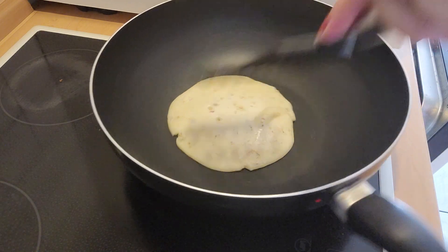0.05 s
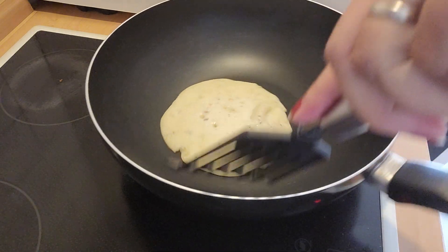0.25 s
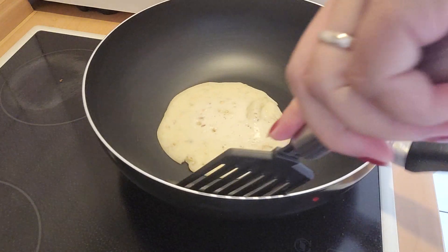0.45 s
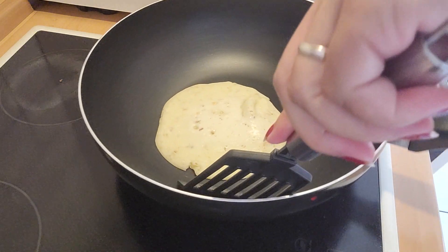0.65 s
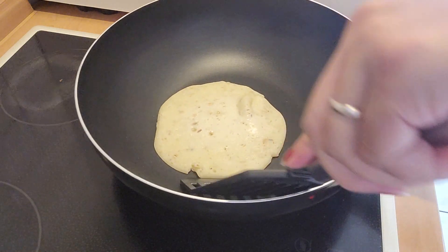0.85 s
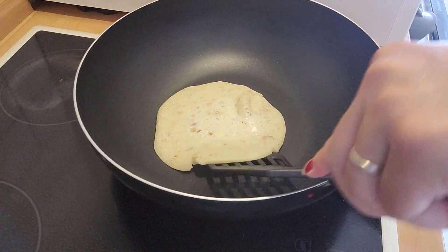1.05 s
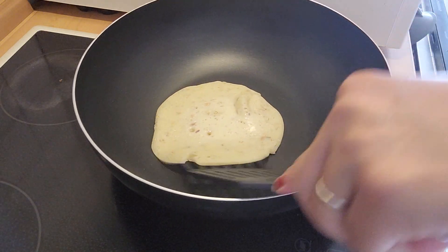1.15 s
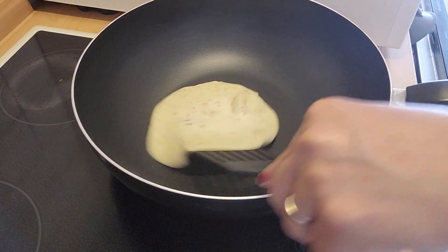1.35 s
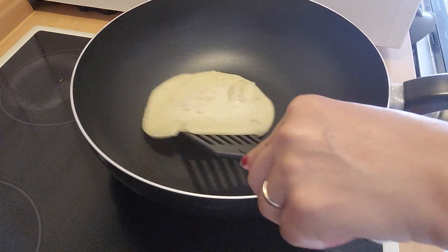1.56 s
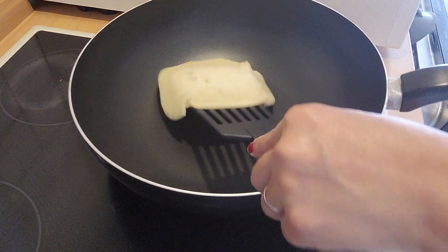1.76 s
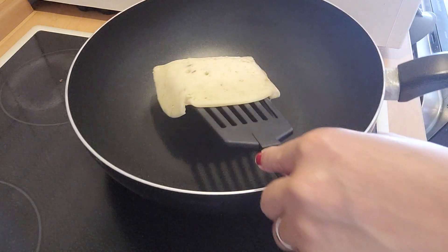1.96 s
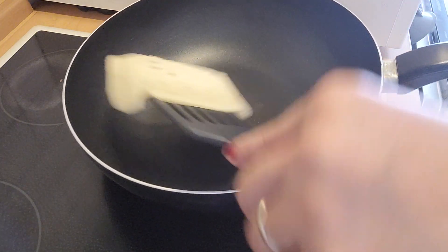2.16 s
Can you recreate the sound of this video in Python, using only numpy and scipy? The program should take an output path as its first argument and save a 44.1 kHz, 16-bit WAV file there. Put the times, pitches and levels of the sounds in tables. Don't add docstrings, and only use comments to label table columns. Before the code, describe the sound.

Close up, a spatula blade clicks down on a coated pan, pauses faintly, then scratches under a pancake in short irregular bursts, with low pan thuds, soft hum and a distant dull knock at the end.

```python
import sys
import numpy as np
from scipy import signal
from scipy.fft import rfft, irfft
from scipy.io import wavfile
from scipy.ndimage import uniform_filter1d

SR = 44100
rng = np.random.default_rng(int(sys.argv[2]) if len(sys.argv) > 2 else 0)


def store_wav(level_fs):
    pcm = np.round(np.clip(np.atleast_2d(level_fs), -1, 1) * 32767)
    wavfile.write(sys.argv[1], SR, pcm.T.astype(np.int16))


def volts(x):
    e = np.asarray(x, float) / 20
    return 10 ** e


N = 97020
T = np.arange(N) / SR


def ring(x, hz, width_hz):
    return signal.lfilter(*signal.iirpeak(hz, hz / width_hz, fs=SR), x)


def mode(x, hz, width_hz, skirt):
    sharp = ring(x, hz, width_hz)
    return np.sqrt(SR / np.pi / width_hz) * ring(sharp, hz, skirt * width_hz)


def unit(x):
    return x / np.sqrt(np.mean(x ** 2))


def colour(x, points):
    hz, db = np.array(points, float).T
    log_hz = np.log(np.arange(N // 2 + 1) * SR / N + 1)
    gain = volts(np.interp(log_hz, np.log(hz), db, left=-70))
    return unit(irfft(rfft(x) * gain, N))


def walk(rate):
    hold = max(int(SR / rate), 50)
    levels = rng.standard_normal(N // 50 + 1)
    steps = np.repeat(levels, hold)[:N]
    return unit(uniform_filter1d(uniform_filter1d(steps, hold), hold))


def swell(rows, shape):
    s, rise, fall, db = np.array(rows).T[:4, :, None]
    away = np.where(T < s, (s - T) / rise, (T - s) / fall)
    return volts(db - 20 * np.minimum(away, 20) ** shape)


def struck(s, hz, db, t60, push_s):
    since = np.maximum(T - s, 0)
    fade = volts(db - 60 * since / t60)
    return fade * (1 - np.exp(-since / push_s)) * np.sin(2 * np.pi * hz * since)


def trio():
    return rng.standard_normal(size=(3, N))


def ports(rows):
    lag, share = 3.59, 0.43
    late = irfft(rfft(rows[0]) * np.exp(-2j * np.pi * np.arange(N // 2 + 1) / N * lag), N)
    return np.sqrt(share) * np.array([late, rows[0]]) + np.sqrt(1 - share) * rows[1:]


# (pitch [Hz], level per Hz [dB])
AIR_SPECTRUM = [(71, -37.5), (140, 0), (195, -10.5), (260, -0.5), (410, -29), (592, -6.5), (800, -41.5),
                (1400, -54), (7660, -48), (16000, -42.5)]


def still_air():
    hush = volts(-69) * colour(rng.standard_normal(N), AIR_SPECTRUM)
    vent = unit(ring(rng.standard_normal(N), 581, 88))
    return hush + volts(-74.5 + 1.5 * walk(10)) * vent


def air():
    mid, left, right = still_air(), still_air(), still_air()
    return 0.82 * mid + 0.62 * np.array([left, right])


# (time [s], level [dB])
RUMBLE_LEVEL = [(0, -4), (.3, 4), (.9, 3.5), (1.1, -2.5), (1.6, 1), (2.0, -1.5), (2.2, -6.5)]


def rumble_and_hum():
    noise = trio()
    noise = noise[0] + 0.22 * noise[1:]
    rumble = unit(ring(ring(noise, 48.7, 15.6), 48.7, 31.2))
    throb = unit(ring(ring(noise, 33.2, 20), 33.2, 27))
    hum = np.sqrt(2) * volts(2.2 * walk(12)) * np.sin(2 * np.pi * 100.1 * T + .35 * walk(7.9))
    rumble_db = -57 + np.interp(T, *np.array(RUMBLE_LEVEL).T)
    return volts(rumble_db) * rumble + volts(-61) * hum + volts(-62) * throb


# (time [s], level [dB], loudest pitch [Hz], lift of that pitch [dB])
FAR_KNOCKS = [
    (.014, -60, 1080, 19),
    (1.951, -43, 991, 7),
]
# (pitch [Hz], level [dB], time to die by 60 dB [s])
WOOD_MODES = [(300, -2, .08), (490, 0.5, 0.077), (595, -4, 0.087), (845, -6, 0.16), (991, -7, 0.18),
              (1080, -9.5, 0.13), (1227, -4, 0.11), (1470, -4, 0.15), (2433, -23, .05)]


def knocks():
    push_s, body_hz, body_db, body_t60 = .005, 900, -16.5, 0.27
    out = 0
    for s, db, top_hz, lift_db in FAR_KNOCKS:
        since = np.maximum(T - s, 0)
        push = (since > 0) * np.exp(-since / push_s) * ports(trio())
        out = out + struck(s, top_hz, db + lift_db - 17.5, .17, 0.0011)
        body = (since > 0) * volts(db + body_db - 60 * since / body_t60) * ports(trio())
        out = out + 4 * ring(ring(body, body_hz, 630), body_hz, 720)
        for hz, rel_db, t60 in WOOD_MODES:
            lift = lift_db * np.exp(-(np.log2(hz / top_hz) / .06) ** 2)
            tone = ring(ring(push, hz, 2.4 / t60), hz, hz / 3)
            out = out + volts(db + 17 + rel_db + lift) * tone * np.sqrt(t60 / 0.087)
    return out


# (time [s], level [dB])
SLEEVE_LEVEL = [(0, -72), (.04, -71.5), (.15, -76), (.26, -71.5), (.293, -65), (.32, -74), (.37, -79),
                (.7, -73), (.79, -78), (1.78, -77.5), (1.9, -75), (1.97, -74), (2.03, -85), (2.2, -91)]
# (pitch [Hz], level per Hz [dB])
CLOTH_SPECTRUM = [(410, -41.5), (700, -11), (1060, 0), (1500, -13.5), (3800, -14.5), (4400, -3.5),
                  (13000, -6), (16000, -12.5)]


def sleeve():
    rub = ports(trio()) * volts(1.5 * walk(60) + 1.4 * walk(400))
    return colour(rub, CLOTH_SPECTRUM) * volts(np.interp(T, *np.array(SLEEVE_LEVEL).T) + 3.5)


# (time [s], pitch [Hz], level [dB], time to die by 60 dB [s])
WORKTOP_THUDS = [(.25, 165, -66, 0.56), (.27, 52.7, -44, 0.47), (.386, 285.7, -49.5, .12),
                 (.388, 75, -41, 0.32), (.39, 174.6, -53, 0.24), (.43, 59.7, -42, 0.21),
                 (0.439, 165.6, -54, .2), (.55, 184, -57, 0.21), (.66, 169, -59, .25),
                 (.53, 67.6, -40.5, .3), (.545, 135.6, -48.5, .25), (0.649, 115, -49, 0.22),
                 (.73, 51.8, -48, 0.53), (.78, 206, -57.5, 0.25), (.80, 269.5, -53, 0.38),
                 (0.799, 78, -46.5, .3), (.74, 139, -58, 0.36), (.84, 166, -56, 0.22),
                 (1.20, 250, -54.5, 0.13), (.90, 60, -54, .2), (1.279, 120.6, -52.5, .2),
                 (1.20, 95, -46, 0.42), (1.21, 72, -47, 0.21)]


def worktop():
    return sum(struck(s, hz, db + 7.0, t60, 0.0092) for s, hz, db, t60 in WORKTOP_THUDS)


def skid():
    start_s, length_s, from_hz, to_hz = 1.198, .022, 2700, 847
    u = np.clip((T - start_s) / length_s, 0, 1)
    hz = from_hz * (to_hz / from_hz) ** u * (1 + 0.0499 * walk(300))
    tone = np.sin(2 * np.pi * np.cumsum(hz) / SR)
    return volts(-38 + 2.5 * walk(250)) * np.sin(np.pi * u) * tone


# (time [s], half length [s], pitch [Hz], level [dB])
SINGING_TONES = [(.39, .015, 5150, -54), (.395, .02, 4450, -62), (.41, 0.028, 1782, -51),
                 (0.418, .03, 561, -55), (.43, .04, 2170, -56), (.43, 0.027, 990, -57),
                 (0.467, 0.026, 1830, -55.5), (0.472, 0.06, 5100, -57.5), (.48, .03, 4500, -61),
                 (.505, 0.031, 1808, -53.5), (.548, .009, 7400, -46), (0.545, .012, 2647, -51),
                 (0.589, .03, 996, -59), (.955, .025, 1627, -58.5), (0.958, .025, 4700, -61),
                 (.988, .016, 1311, -48), (1.01, .02, 3160, -52.5), (1.016, .02, 4470, -50.5),
                 (1.02, 0.034, 1640, -51.5), (1.024, .025, 1830, -50.5), (1.047, 0.021, 1060, -43),
                 (1.07, 0.021, 4500, -50), (1.155, .02, 3000, -57), (1.185, .016, 1840, -41),
                 (1.193, .018, 1726, -44), (1.203, .012, 2380, -48), (1.205, 0.016, 4210, -48.5),
                 (1.205, .015, 4800, -49), (1.229, .025, 2650, -49), (1.26, 0.016, 3200, -51),
                 (1.272, 0.021, 1048, -41.5), (1.277, .02, 2127, -47), (1.29, .02, 4500, -53),
                 (1.30, .03, 4204, -52), (1.39, .018, 3154, -50), (1.395, .015, 1077, -46),
                 (1.395, .012, 1694, -53), (1.39, .02, 720, -52.5), (1.47, 0.021, 1436, -51),
                 (1.479, .025, 2044, -51), (1.475, .022, 772, -49), (1.494, .018, 720, -50),
                 (1.495, 0.019, 3845, -52), (1.505, .015, 3110, -53), (1.574, .02, 682.3, -50),
                 (1.575, .02, 3180, -56), (1.58, .025, 3840, -59), (1.634, 0.026, 712, -53.5),
                 (1.713, .02, 6800, -62.5), (0.742, 0.069, 1000, -75)]


def singing():
    wobble_hz, flicker_db = 21.2, 3.2
    out, wobble, flicker = np.zeros((2, N)), walk(260), walk(110)
    chances = rng.standard_normal(size=(len(SINGING_TONES), 2))
    for (s, half, hz, db), (a, b) in zip(SINGING_TONES, chances):
        near = np.flatnonzero((np.abs(T - s) < 3 * half) & (T > BLADE_LANDINGS[0][0]))
        own = (near + int(abs(a) * N)) % N
        phase = 2 * np.pi * np.cumsum(hz + wobble_hz * wobble[own]) / SR
        lag = 1.09 + 0.27 * b
        env = volts(db + 3.0 + flicker_db * flicker[own]) * np.exp(-((T[near] - s) / half) ** 2)
        out[:, near] += env * np.sin(np.array([phase - lag, phase]))
    return out


# (pitch [Hz], width [Hz], level [dB])
BOWL_MODES = [(166, 16, -14.5), (217, 40, -12), (250, 24, -5.5), (279.8, 24.8, -3), (464.6, 28, -8.5),
              (563, 34, -7), (640, 39, -8)]


def bowl_ring(grains, loudness):
    lifted_db = -20 / (1 + np.exp((1.28 - T) / 0.034))
    drive = volts(-27 + lifted_db) * loudness ** 0.59 * unit(grains)
    out = 0
    for hz, width, db in BOWL_MODES:
        out = out + volts(db) * mode(drive * volts(2.5 * walk(8.95)), hz, width, 2.4)
    return out


# (pitch [Hz], width [Hz], level [dB])
WOK_MODES = [(689, 35, -2.5), (745, 36, -3.5), (859, 38, -5.5), (1060, 36, -4), (1240, 49, -6),
             (1404, 43, -6.5), (1640, 44, -7.5), (1830, 32, -2), (2140, 32, -6), (2440, 100, -6.5),
             (3150, 130, -13), (4210, 45, -9.5), (4480, 40, -5.5), (4700, 54, -8),
             (5110, 90, -8.5), (5580, 72, -10), (6100, 120, -13), (6800, 100, -11), (7340, 140, -8),
             (8280, 120, -7.5)]


def wok_ring(grains, power, pitch):
    favour_db, favour_oct = 5, 0.089
    out = 0
    for hz, width, db in WOK_MODES:
        near = volts(favour_db * np.exp(-(np.log2(hz / pitch) / favour_oct) ** 2))
        drive = np.sqrt(near ** 2 @ power) * grains * volts(1.4 * walk(18))
        out = out + volts(db - 13.5) * mode(drive, hz, width, 6)
    return out


# (pitch [Hz], level per Hz [dB])
EDGE_HISS = [(400, -36), (600, -16.5), (750, -4.5), (1500, -2), (3000, -4), (5500, -4), (11000, -11),
             (16000, -19)]
# (pitch [Hz], level per Hz [dB])
FLAT_HISS = [(500, -19), (950, -2), (1350, -10.5), (1950, -2.5), (3300, -8.5), (5000, -2), (6300, -6.5),
             (15000, -20)]


def blade_hiss(grains, env, pitch, flat):
    power = env ** 2
    out = colour(grains, EDGE_HISS) * np.sqrt(~flat @ power)
    out = out + colour(grains, FLAT_HISS) * np.sqrt(flat @ power)
    for e, hz in zip(env, pitch):
        out = out + volts(-11.5) * e * unit(ring(grains, hz, hz * 0.44))
    return out


# (time of top speed [s], time to rise 20 dB [s], time to fall 20 dB [s],
# level [dB], pitch the blade favours [Hz])
SCRAPE_STROKES = [(0.406, .025, .17, -51.5, 1820), (.47, 0.1023, .1, -53.5, 5200),
                  (.50, .08, 0.04, -56, 1830), (.60, 0.06, 0.1, -64, 1060), (0.663, 0.02, 0, -63.5, 6000),
                  (.76, 0.16, 0.5, -76, 1010), (.825, .022, 0.11, -60.5, 900),
                  (0.911, .08, 0.17, -57, 1300), (1.0, 0.07, .07, -45, 1360),
                  (1.03, 0.084, 0.0466, -52.5, 4480), (1.049, 0.0872, .045, -45, 1060),
                  (1.186, 0.0762, 0.0465, -43, 4500), (1.205, 0.03, 0.0333, -40.5, 4540),
                  (1.267, 0.0384, 0.05, -45, 3200), (1.279, 0.0663, 0.04, -47.5, 2140),
                  (1.299, 0.0345, 0.05, -44.5, 3150), (1.391, 0.0384, 0.04, -43.5, 1720),
                  (1.42, 0.0535, .08, -56.5, 726), (1.49, .06, 0.0362, -42, 2030),
                  (1.49, 0.0866, 0.066, -49, 715), (1.569, 0.0346, 0.04, -49, 1640),
                  (1.579, 0.07, 0.0669, -53.5, 730), (1.646, 0.1, .05, -56, 700),
                  (1.709, 0.1228, 0.0475, -58.5, 6800)]
# (time [s], rise [s], fall [s], level [dB], favoured pitch [Hz])
BLADE_LANDINGS = [
    (.387, 0.0031, 0.046, -41.5, 5240),
    (.545, 0.0057, 0.031, -39, 7400),
]


def spatula():
    grains_per_s, slide_ends_s = 9000, .53
    env = np.vstack([swell(SCRAPE_STROKES, 1.66), swell(BLADE_LANDINGS, 0.99)])
    moves = np.vstack([SCRAPE_STROKES, BLADE_LANDINGS])
    pitch = moves[:, 4]
    flat = moves[:, 0] < slide_ends_s
    catches = np.abs(trio()) < 1.25 * grains_per_s / SR
    raw = catches * trio() * volts(1.5 * walk(180))
    grains = unit(ports(raw))
    power = env ** 2
    loudness = np.sqrt(np.sum(power, axis=0))
    hiss = blade_hiss(grains, env, pitch, flat)
    return hiss + wok_ring(grains, power, pitch) + bowl_ring(raw[0], loudness)


def tail(t60, gap_s):
    u = T[:SR // 3]
    echoes = rng.standard_normal((2, len(u))) * volts(-60 * u / t60) * (u > gap_s)
    return echoes / np.sqrt(np.sum(echoes ** 2, axis=1, keepdims=True))


def lean(left_db):
    return volts(np.array([[left_db], [-left_db]]) / 2)


def scene():
    near = volts(4) * spatula() + singing() + skid() + sleeve() + knocks()
    wet = signal.fftconvolve(near, volts(-11) * tail(0.17, .004), axes=1)[:, :N]
    low = worktop() + rumble_and_hum()
    return lean(1.2847) * (near + wet + air()) + lean(4) * low


def band_limit(x):
    return signal.sosfilt(signal.butter(12, 16440, fs=SR, output="sos"), x)


def record(dry):
    low_pass = signal.ellip(8, .2, 40, 15900, fs=SR, output="sos")
    mix = signal.sosfilt(low_pass, dry) * np.minimum((T[-1] - T) / .004, 1)
    return band_limit(mix)


dry = scene()
out = record(dry)
store_wav(out)
```